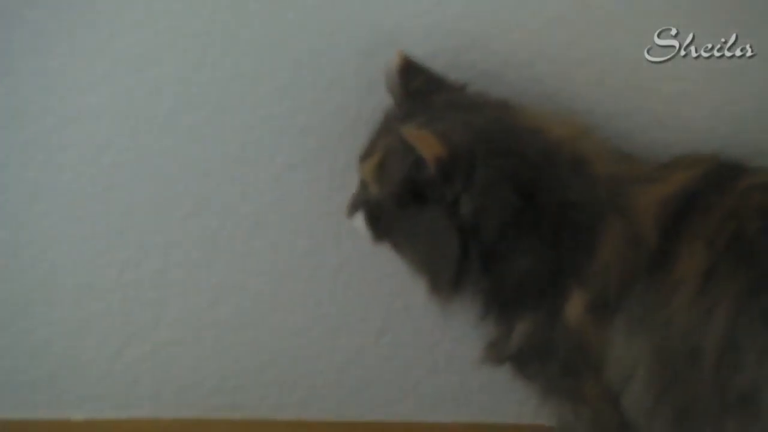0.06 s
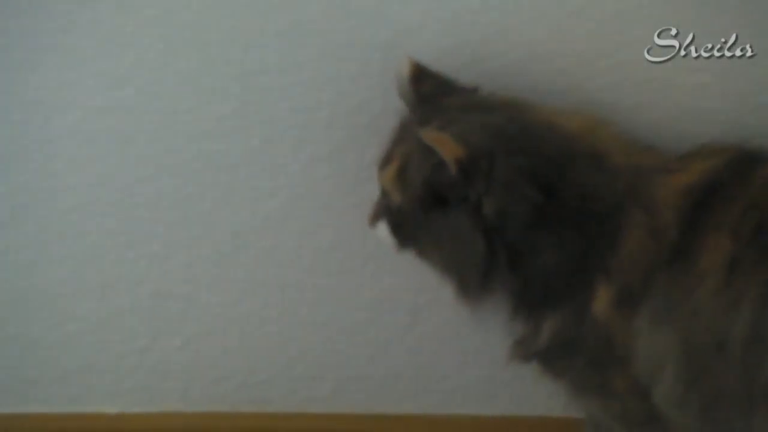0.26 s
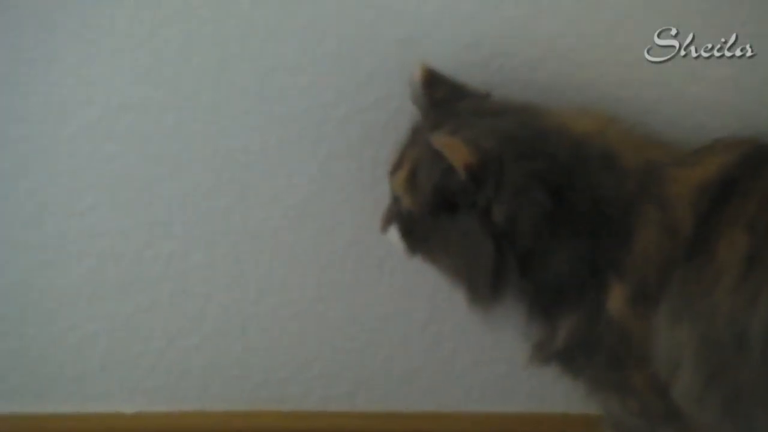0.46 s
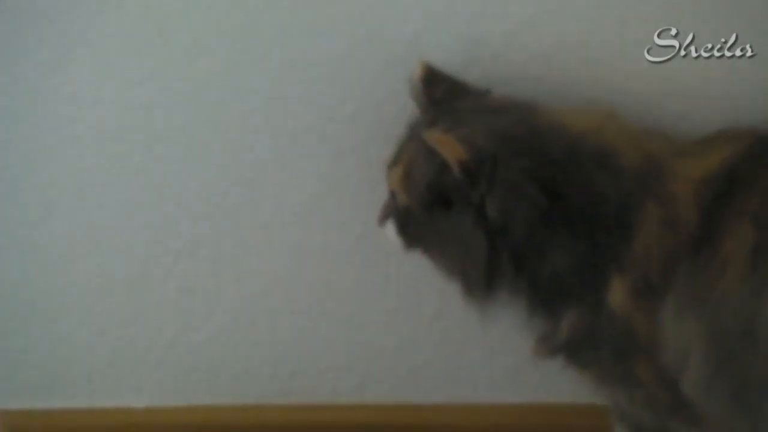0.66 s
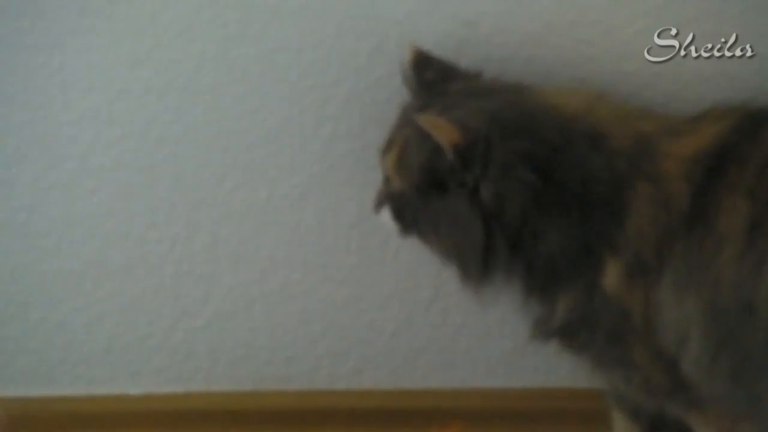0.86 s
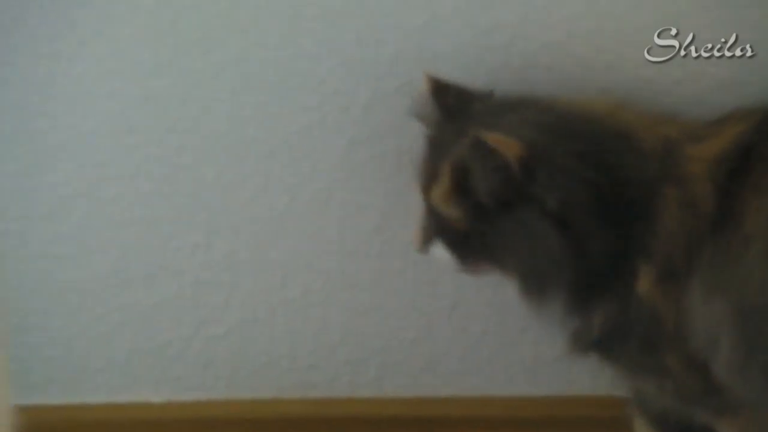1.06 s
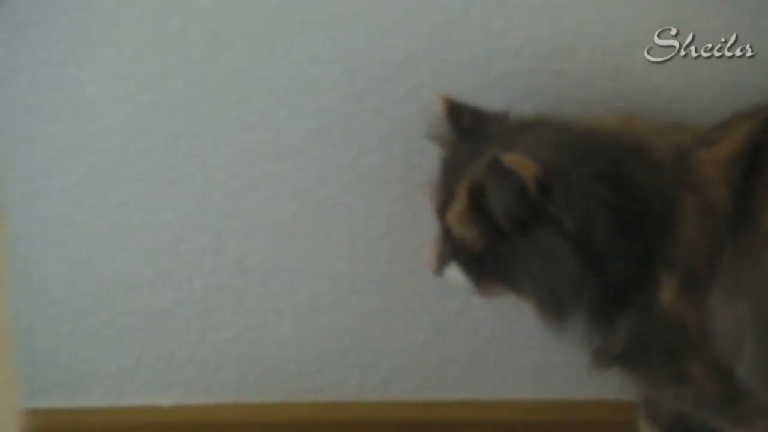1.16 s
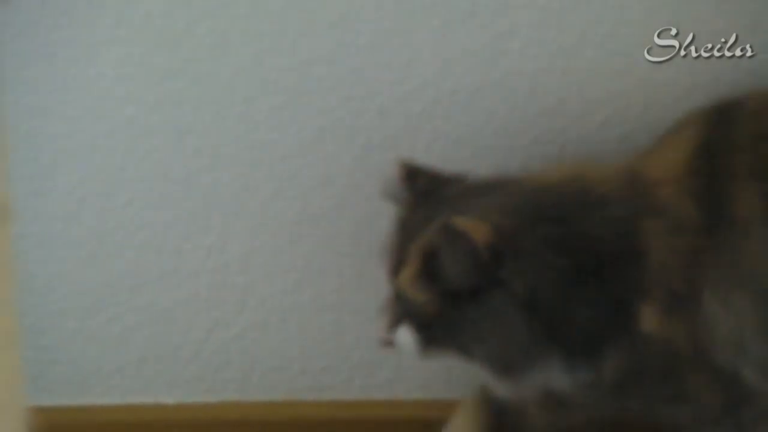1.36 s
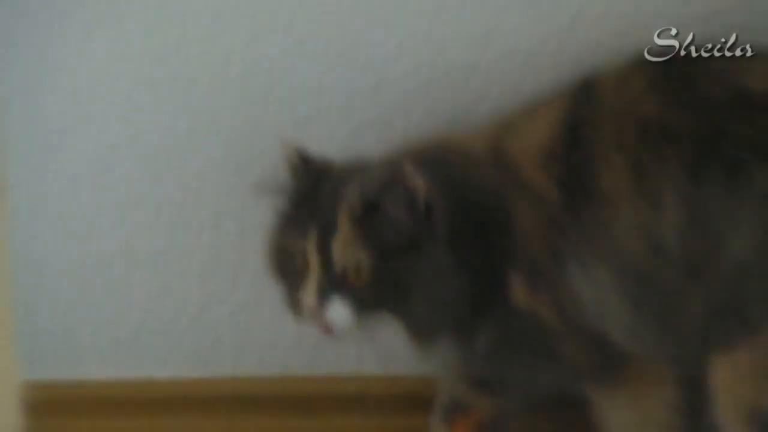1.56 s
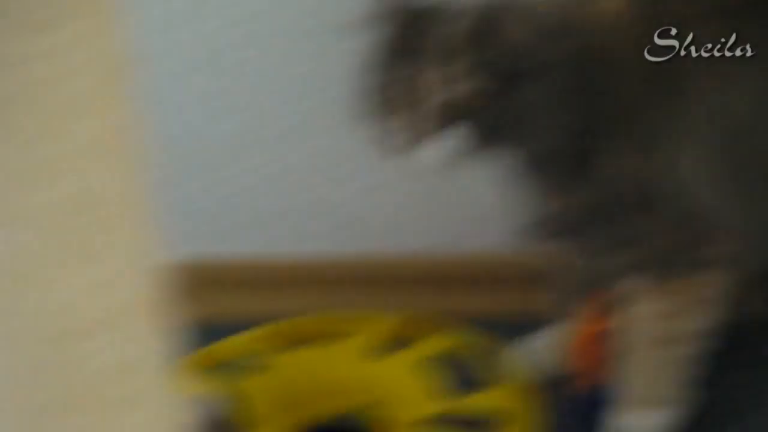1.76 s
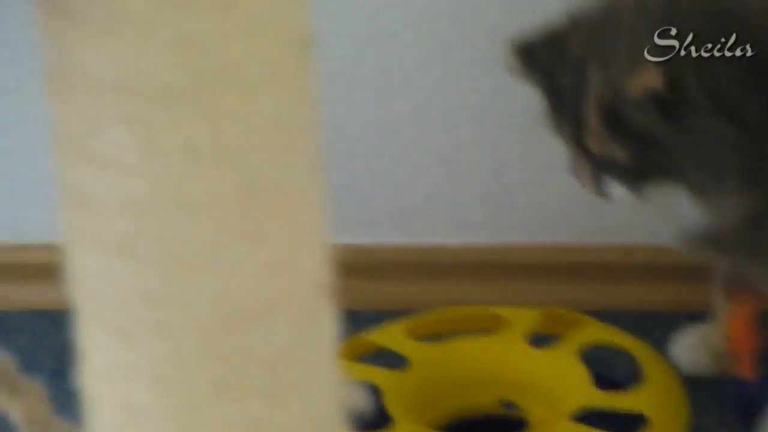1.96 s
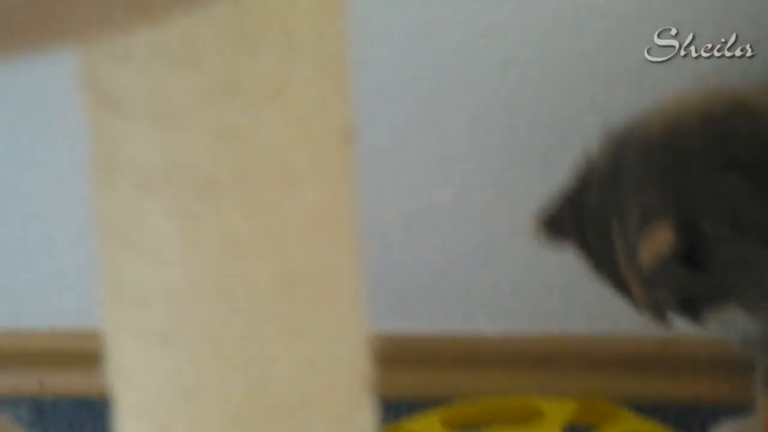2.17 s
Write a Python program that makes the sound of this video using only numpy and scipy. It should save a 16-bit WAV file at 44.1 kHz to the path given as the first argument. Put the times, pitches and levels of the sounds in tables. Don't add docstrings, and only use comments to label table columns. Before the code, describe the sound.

Close crinkling of thin film snaps and rustles, then soft paw thuds and scuffs from a cat on carpet, followed by lighter sparse crackles; short indoor reflections, low room tone and microphone hiss.

```python
import sys
import numpy as np
from scipy import signal
from scipy.fft import rfft, irfft, next_fast_len
from scipy.io import wavfile

SR = 44100
rng = np.random.default_rng(int(sys.argv[2]) if len(sys.argv) > 2 else 0)


def nominal_scale(level):
    x = np.asarray(level, float) / 20
    return 10 ** x


def dump(signal):
    limited = np.clip(np.atleast_2d(signal).T, -1, 1)
    pcm = np.round(limited * 32767).astype(np.int16)
    wavfile.write(sys.argv[1], SR, pcm)


N = 97020

# start in [s], peak in [dB], joist boom in [dB], claw-and-pile brightness in [dB].
PAW_FALLS = [(0.037, -47.5, -21, -30), (0.279, -54.5, -8, -12), (0.47, -46, -11, -13),
             (0.683, -42.5, -26, 6), (0.722, -45.5, -7.5, -2), (1.025, -30, -16, -3.5),
             (1.062, -40.5, -8, -7.5), (1.097, -40.5, -34, -4), (1.247, -36.5, -7, -5.5),
             (1.286, -42.5, -13, -1.5), (1.382, -30.5, -36, -0.5), (1.433, -51, -21, -8),
             (1.678, -54, -25, 9), (1.686, -42.5, -37, -12), (2.157, -51, -13, 2.5)]
# pitch in [Hz], width in [Hz], level in [dB].
FLOOR_MODES = [(336.5, 56, -8), (400, 79, 10), (461.6, 33.4, 8), (518, 20, -4.5), (665, 52, -4),
               (730, 29, -1.5), (983, 29, 0.5), (1211, 130, -4.5), (2080, 200, -9.5)]
# pitch in [Hz], width in [Hz], level in [dB].
JOIST_MODES = [(62, 44, -5), (90, 23, -1.5), (170, 52, -1), (231, 34, 2)]
# frequency in [Hz], density in [dB per Hz].
PILE_SPECTRUM = [(530, -36), (900, -6.5), (1240, -4.5), (1580, -8.5), (2510, -5.5), (5990, -14),
                 (15000, -34)]
# start in [s], pitch in [Hz], width in [Hz], peak in [dB].
WEIGHT_THUDS = [(0.678, 127, 60, -50), (.715, 170, 70, -47), (0.951, 109, 36.2, -61),
                (1.023, 90, 53.6, -44), (1.061, 90, 30, -44.5), (1.245, 190, 74, -47), (1.25, 62, 44, -49),
                (1.276, 86, 26, -42.5), (1.378, 170, 47.4, -36), (1.391, 65, 37, -54),
                (1.448, 78.4, 37, -55.5)]
# start in [s], pitch in [Hz], width in [Hz], peak in [dB].
FLOOR_RINGS = [(.467, 1190, 90, -48), (.467, 758, 70, -47.5), (.468, 446, 60, -43.5),
               (.476, 670, 110, -45.5), (.511, 404.5, 40.3, -45), (.513, 720, 110, -47.5),
               (.578, 434, 30.6, -44.5), (.616, 432, 30.2, -47), (.676, 1170, 152, -42),
               (.682, 392.5, 71, -36), (.75, 382, 35, -50.5), (1.247, 366, 49.7, -43),
               (1.248, 990, 90, -54), (1.542, 417.5, 30, -54.5), (1.32, 347, 30, -52),
               (1.381, 417, 41, -31.5), (1.384, 1237, 68, -48), (1.388, 633, 50, -40),
               (1.39, 1015, 70, -51.5), (1.432, 440, 25, -43), (1.472, 447, 41, -45.5),
               (1.686, 1240, 150, -48), (1.689, 447, 49.7, -45), (1.748, 420, 39.7, -52.5)]
# start in [s], pitch in [Hz], width in [Hz], peak in [dB].
WEIGHT_SHIFTS = [
    (.002, 500, 250, -52),
    (.672, 760, 200, -43.5),
    (.96, 600, 300, -52),
    (1.148, 850, 450, -48.5),
    (1.503, 423, 30, -51.5),
]
# start in [s], length in [s], level in [dB].
PAW_DRAGS = [
    (0.452, 0.21, -53),
    (0.708, 0.07, -57),
    (1.385, 0.078, -55),
    (1.662, 0.052, -67),
]
# start in [s], peak in [dB].
CLAW_TAPS = [
    (.4655, -40.5),
    (.512, -47.5),
    (.54, -45),
    (1.003, -45),
    (1.245, -42.5),
    (1.384, -46),
    (1.682, -49.5),
]
# pitch in [Hz], width in [Hz], level in [dB].
PLASTIC_MODES = [(700, 116, 4.5), (810, 68, 3.5), (1180, 540, -7), (1480, 29, 2), (1800, 160, -6.5),
                 (2100, 140, -23)]
# start in [s], peak in [dB], treble lift in [dB].
CREASE_SNAPS = [(0.216, -36.5, -1), (0.2381, -27.5, 27), (0.2532, -31, -9), (0.2694, -27.5, 0),
                (0.288, -27.5, -13), (0.3429, -26.5, -4), (0.5892, -37, 8), (0.636, -21, 12),
                (0.6539, -14.5, 3.5), (0.6638, -42, -12), (0.784, -33, 5), (0.8323, -31, 20),
                (0.892, -36, -16), (0.9453, -39, -13), (1.0221, -29, -8), (1.0893, -41, 9),
                (1.2426, -48, 14), (1.3793, -51, -5), (1.3908, -30.5, 29), (1.588, -45, 17),
                (1.677, -45, -27), (1.769, -40, 12), (1.7764, -37.5, 9), (1.8165, -37.5, 21),
                (1.8413, -44, 1), (1.9025, -47, -5), (1.9439, -30.5, -11), (2.0771, -37, 22),
                (2.17, -39.5, 12)]
# frequency in [Hz], density in [dB per Hz].
FILM_SPECTRUM = [(530, -71), (900, -25.5), (1910, -16), (2070, -10), (2690, -10), (4230, -6), (5180, -9.5),
                 (11100, -22), (15500, -39)]
# pitch in [Hz], width in [Hz], level in [dB].
SNAP_PEAK = [(4240, 300, 2)]
# start in [s], peak in [dB], pitch in [Hz], width in [Hz].
CREASE_TICKS = [(.2335, -38, 4300, 1500), (.242, -29.5, 4530, 1200), (.2545, -38, 3660, 1000),
                (.2655, -38, 4500, 2000), (.2785, -35, 3160, 2500), (.3415, -33.5, 4130, 1500),
                (.3445, -32, 4200, 1180), (.3485, -36, 4000, 1000), (.357, -40, 2940, 2000),
                (.373, -39, 3770, 3000), (.554, -44, 3740, 3000), (.5845, -42.5, 2100, 496),
                (.601, -41, 2220, 600), (.613, -42, 2350, 900), (.6285, -37, 4300, 1800),
                (0.6564, -20.5, 4500, 2020), (.662, -35, 4360, 1200), (.668, -25, 4430, 895),
                (.677, -34, 2140, 910), (.692, -31.5, 4250, 1190), (.706, -33.5, 4040, 1490),
                (.721, -39, 2000, 1500), (.907, -48, 4100, 1500), (.963, -40, 4400, 1200),
                (1.003, -41, 2980, 3000), (1.278, -38.5, 2500, 2500), (1.6775, -45, 4000, 2480),
                (1.7995, -51, 3320, 1500), (1.8165, -41.5, 11050, 2500), (1.8445, -38, 3650, 2500),
                (1.873, -53, 4200, 2500), (1.8992, -31.5, 3960, 2960), (1.8992, -55, 9000, 2500),
                (1.9435, -43.5, 11360, 1500)]
# time of peak in [s], rise in [s], fall in [s], level in [dB].
RUSTLE_SWELLS = [(.0, 0.0091, 0.012, -50), (.245, 0.015, 0.063, -49), (0.289, 0.019, 0.021, -54.5),
                 (0.358, 0.025, 0.021, -59), (.55, 0.077, 0.19, -57), (0.632, 0.0052, 0.02, -44.5),
                 (.669, 0.0065, 0.028, -40), (0.849, 0.048, 0.0095, -60), (0.909, 0.019, 0.042, -58.5),
                 (0.999, 0.036, 0.03, -54), (1.151, 0.013, 0.032, -59), (1.27, 0.013, 0.041, -72),
                 (1.45, 0.13, 0.14, -59.5), (1.686, 0.0049, 0.012, -56.5), (1.78, 0.005, 0.023, -64),
                 (1.849, 0.035, 0.067, -52.5), (1.909, 0.03, 0.015, -50), (1.958, 0.017, 0.031, -52.5),
                 (2.1, 0.021, 0.03, -59), (2.188, 0.022, 0.035, -53.5)]
# frequency in [Hz], t60 in [s].
WALL_DECAY = [(100, 0.6), (420, 0.53), (1200, 0.14), (4000, 0.093), (10000, 0.15)]
# frequency in [Hz], ratio in [dB].
ROOM_WIDTH = [(200, -25), (2000, -20), (5000, -13.5), (10000, -3.5)]
# frequency in [Hz], density in [dB per Hz].
TONE_SPECTRUM = [(15, -46), (25, -9.5), (114, -0.5), (220, -13), (401, 0), (541, -10), (628, -9), (708, -5),
                 (900, -13.5), (1170, -20), (1980, -120)]
# frequency in [Hz], density in [dB per Hz].
HISS_SPECTRUM = [(350, 24), (600, -11.5), (942, -5.5), (1540, -7), (1690, -6), (3010, -6.5), (5950, -7),
                 (15700, -17.5)]
# frequency in [Hz], correlation in [0 to 1].
NOISE_LIKENESS = [(60, 0.93), (240, 0.72), (950, 0.84), (3770, 0.44), (15000, 0.084)]

PAW_S, BOOM_S, PILE_S, THUD_S = 0.037, 0.022, 0.16, 0.073
SNAP_S, TICK_S, TAP_S, GRAIN_S = 0.011, 0.0072, 0.09, 0.006
PAW_WET_DB, THUD_WET_DB, TAP_WET_DB = -3, -7.5, -6
SNAP_WET_DB, TICK_WET_DB, RUSTLE_WET_DB = -7, -3, -5
SCUFF_RISE_S, SCUFF_FALL_S = 0.028, 0.024
SNAP_LOW_HZ, TREBLE_HZ = 1800, 6840
GRAINS_PER_S, GRAIN_SPREAD_DB = 2600, 2.4
TONE_DB, HISS_DB = -66, -62


def paws():
    out = np.zeros((2, N))
    pile = causal([(300, -44)] + PILE_SPECTRUM)
    for s, db, boom_db, bright_db in PAW_FALLS:
        x = burst(PAW_S, ringing(FLOOR_MODES), 0.00059, 6.7)
        x = x + nominal_scale(boom_db) * burst(BOOM_S, ringing(JOIST_MODES), 0.0014, 3.9)
        x = x + nominal_scale(bright_db) * burst(PILE_S, pile, 0.00037)
        add(out, s - 0.002, nominal_scale(db - 2) * room(x, PAW_WET_DB))
    return out


def thuds(rows):
    out = np.zeros((2, N))
    for s, hz, width_hz, db in rows:
        add(out, s, nominal_scale(db) * room(burst(THUD_S, one_band(hz, width_hz), 0.0012, 0.79), THUD_WET_DB))
    return out


def scuffs():
    t = np.arange(N) / SR
    push = np.zeros(N)
    for s, length, db in PAW_DRAGS:
        rise = np.clip((t - s) / SCUFF_RISE_S, 0, 1)
        fall = np.exp(-np.clip(t - s - length, 0, None) / SCUFF_FALL_S)
        push += nominal_scale(db) * rise * fall
    rub = unit(filtered(rng.standard_normal(N), ringing(FLOOR_MODES)))
    return room(push * rub, PAW_WET_DB)


def taps():
    out = np.zeros((2, N))
    for s, db in CLAW_TAPS:
        add(out, s, nominal_scale(db) * room(burst(TAP_S, ringing(PLASTIC_MODES), 0.00052), TAP_WET_DB))
    return out


def snaps():
    out = np.zeros((2, N))
    film = causal([(300, -60)] + FILM_SPECTRUM)
    for s, db, treble_db in CREASE_SNAPS:
        def crease(f):
            body = film(f) * (1 + ringing(SNAP_PEAK)(f))
            treble = 1 + (nominal_scale(treble_db) - 1) * 1j * f / (TREBLE_HZ + 1j * f)
            low_cut = (1j * f / (SNAP_LOW_HZ + 1j * f)) ** 2
            return body * treble * low_cut
        add(out, s, nominal_scale(db - 1.5) * room(burst(SNAP_S, crease, 0.00037, 2.1), SNAP_WET_DB))
    return out


def ticks():
    out = np.zeros((2, N))
    for s, db, hz, width_hz in CREASE_TICKS:
        add(out, s, nominal_scale(db) * room(burst(TICK_S, one_band(hz, width_hz), 0.00011, 0.4), TICK_WET_DB))
    return out


def rustle():
    t = np.arange(N) / SR
    chance, size = rng.random((2, N))
    kicks = (chance < GRAINS_PER_S / SR) * nominal_scale(-GRAIN_SPREAD_DB * np.log(size + 0.03))
    decays = signal.lfilter([1], [1, -nominal_scale(-60 / (GRAIN_S * SR))], kicks)
    film = causal([(300, -117)] + FILM_SPECTRUM)
    grains = unit(filtered(decays * rng.standard_normal(N), film))
    swell = np.zeros(N)
    for s, rise, fall, db in RUSTLE_SWELLS:
        growth = np.exp(-((t - s) / rise) ** 2)
        swell += nominal_scale(db) * np.where(t < s, growth, np.exp(-np.abs(t - s) / fall))
    return room(swell * grains, RUSTLE_WET_DB)


def steady_noise(spectrum, db):
    def mid_side(hz):
        angle = np.arccos(np.clip(along(NOISE_LIKENESS, hz), -1, 1)) / 2
        return nominal_scale(along(spectrum, hz)) * np.array([np.cos(angle), np.sin(angle)])
    mid, side = filtered(rng.standard_normal((2, N)), mid_side)
    return nominal_scale(db) * np.array([mid + side, mid - side]) / np.std(mid)


def room(x, wet_db):
    hz, t, z = signal.stft(rng.standard_normal((2, SR * 2 // 5)), SR, nperseg=256)
    t60 = along(WALL_DECAY, hz)[:, None]
    tail = signal.istft(z * nominal_scale(-60 * t / t60) * np.sqrt(1 / t60), SR, nperseg=256)[1]
    tail = tail / np.linalg.norm(tail[0])
    late = np.pad(x, (180, 0))[None]
    wet = signal.fftconvolve(late, tail, axes=1)[:, :len(x)] * nominal_scale(wet_db)
    mid = x + wet[0]
    side = filtered(wet[1] + x, lambda f: nominal_scale(along(ROOM_WIDTH, f)) * np.exp(-2j * np.pi * f * 0.000414))
    return np.array([mid + side, mid - side])


def burst(t60, response, rise=0.001, blow=0):
    t = np.arange(SR * 2 // 5) / SR
    contact = rng.standard_normal(len(t)) * nominal_scale(-60 * t / t60) * (1 - np.exp(-t / rise))
    x = filtered(contact + blow * np.exp(-t / rise), response)
    return x / np.abs(x).max()


def ringing(peaks):
    def response(f):
        total = 0
        for k, (hz, width, db) in enumerate(peaks):
            total = total + (-1) ** k * nominal_scale(db) * 1j * f * width / (hz * hz - f * f + 1j * f * width)
        return total
    return response


def one_band(hz, width_hz):
    return lambda f: ringing([(hz, width_hz * 1.5, 0)])(f) ** 2


def causal(points):
    def response(hz):
        c = irfft(np.log(nominal_scale(along(points, hz)) + 1e-6))
        c[1:len(c) // 2] *= 2
        c[len(c) // 2 + 1:] = 0
        return np.exp(rfft(c))
    return response


def dip(f, hz, width_hz, depth):
    return 1 - np.clip(depth, 0, 1) * np.exp(-((f - hz) / width_hz) ** 2)


def filtered(x, response):
    n = x.shape[-1]
    m = next_fast_len(n + 8192)
    return irfft(rfft(x, m) * response(np.fft.rfftfreq(m, 1 / SR)), m)[..., :n]


def along(points, hz):
    f, v = np.transpose(points)
    return np.interp(np.log(hz + 1), np.log(f + 1), v)


def unit(x):
    return x / np.sqrt(np.mean(x ** 2) + 1e-20)


def add(out, s, x):
    i = round(s * SR)
    out[:, i:i + x.shape[1]] += x[:, :N - i]


def scene():
    contacts = paws() + thuds(WEIGHT_THUDS) + taps() + scuffs()
    steps = filtered(contacts, lambda f: dip(f, hz=262, width_hz=22, depth=0.6))
    steps = steps + thuds(FLOOR_RINGS) + thuds(WEIGHT_SHIFTS)
    toy = snaps() + ticks() + rustle()
    tone = steady_noise(TONE_SPECTRUM, TONE_DB)
    hiss = steady_noise([(330, -60), (480, 1.5)] + HISS_SPECTRUM[1:], HISS_DB)
    return steps + toy + tone + hiss


def low_pass(x):
    return signal.sosfilt(signal.butter(12, 15790, fs=SR, output="sos"), x)


def record(dry):
    mix = filtered(dry, lambda f: dip(f, hz=7790, width_hz=330, depth=0.53) * (f < 15800))
    return low_pass(mix)


dry = scene()
out = record(dry)
dump(out)
```